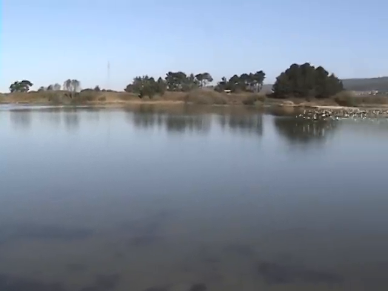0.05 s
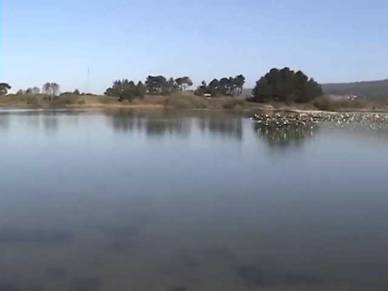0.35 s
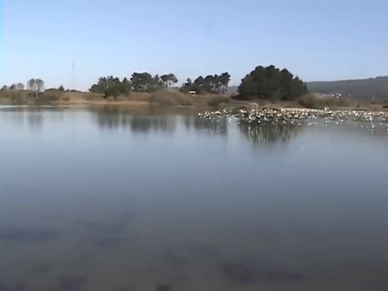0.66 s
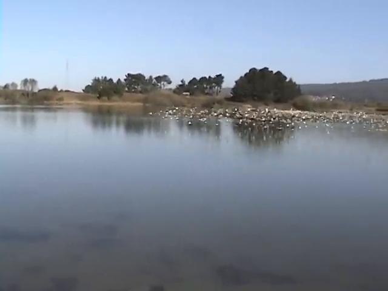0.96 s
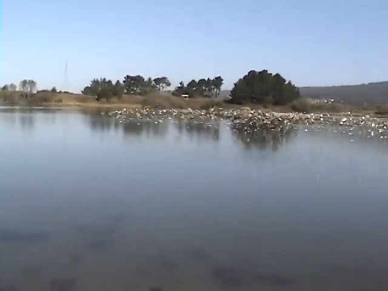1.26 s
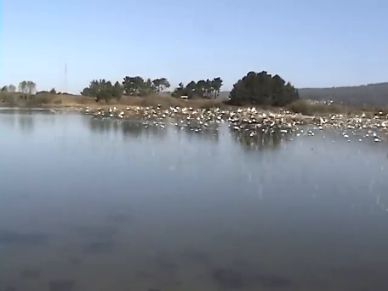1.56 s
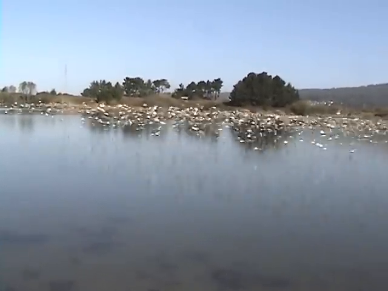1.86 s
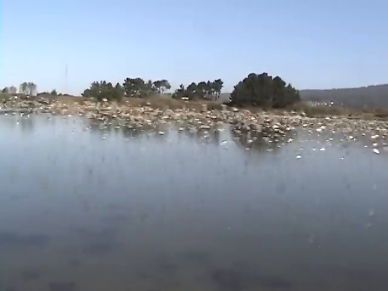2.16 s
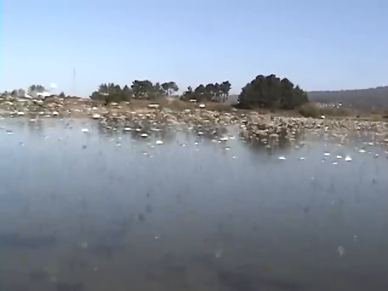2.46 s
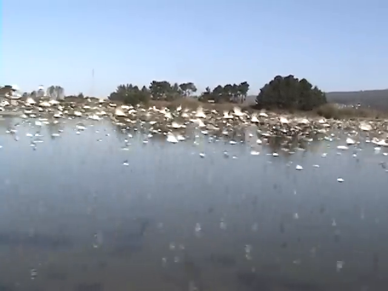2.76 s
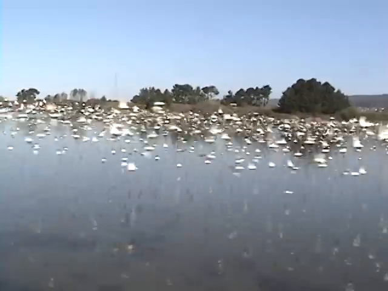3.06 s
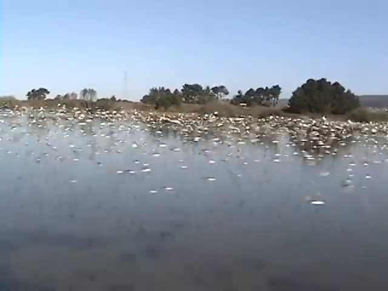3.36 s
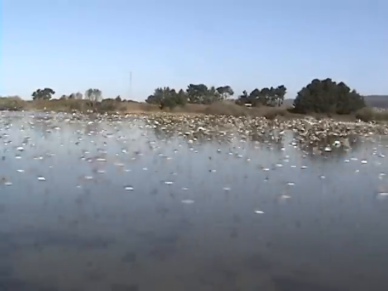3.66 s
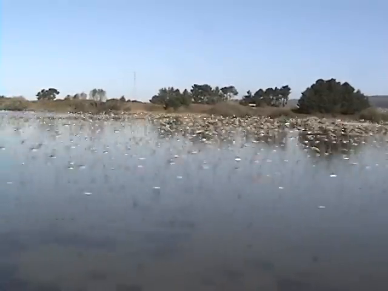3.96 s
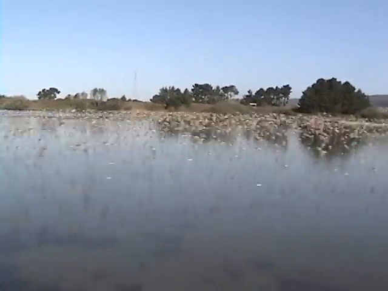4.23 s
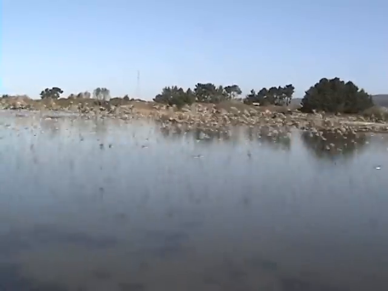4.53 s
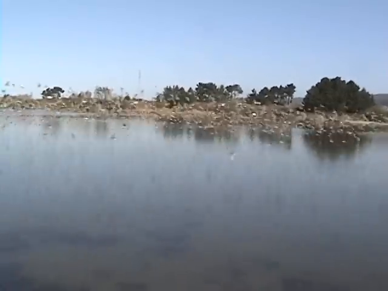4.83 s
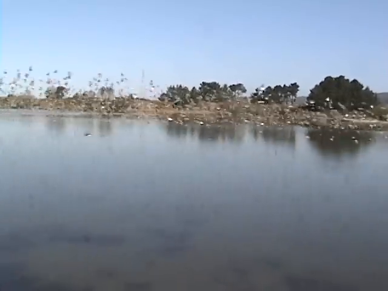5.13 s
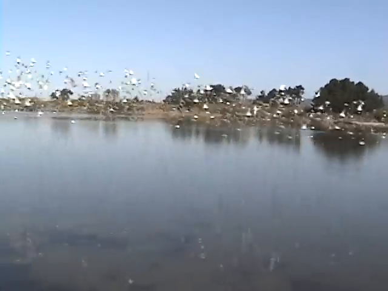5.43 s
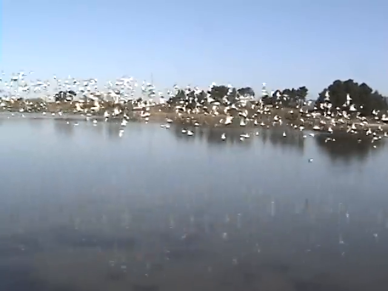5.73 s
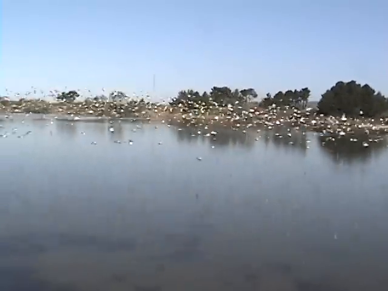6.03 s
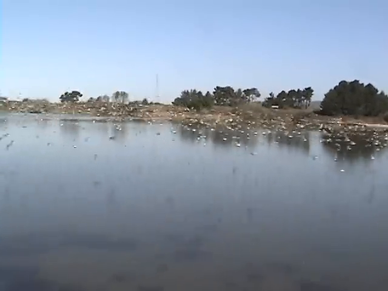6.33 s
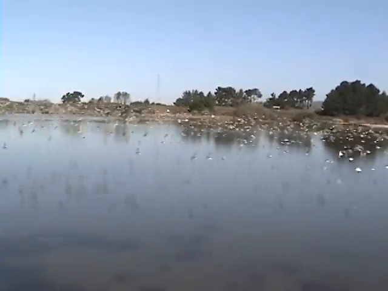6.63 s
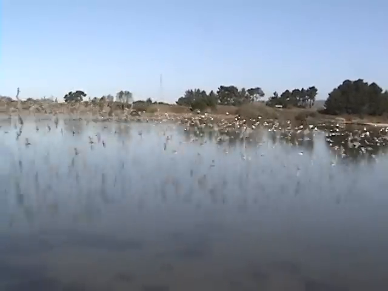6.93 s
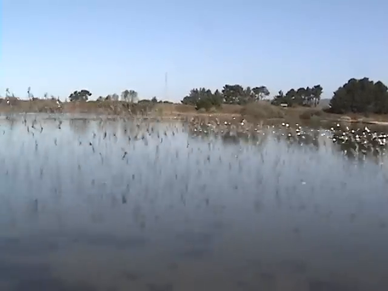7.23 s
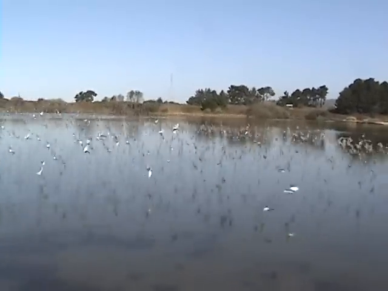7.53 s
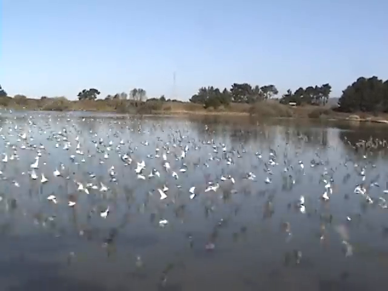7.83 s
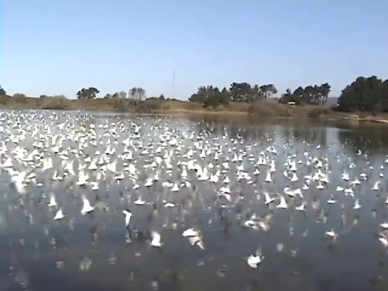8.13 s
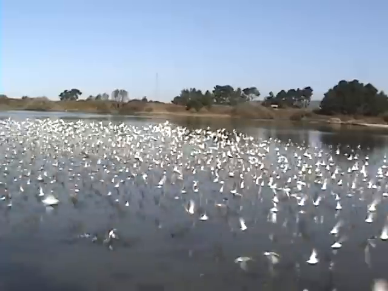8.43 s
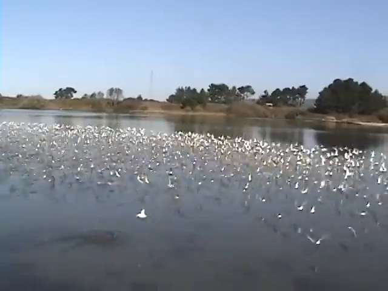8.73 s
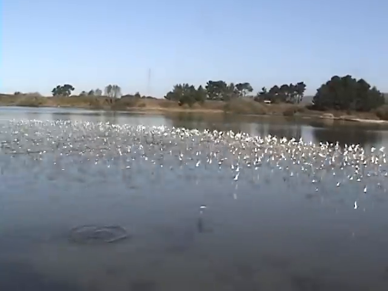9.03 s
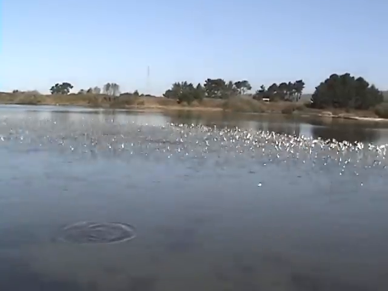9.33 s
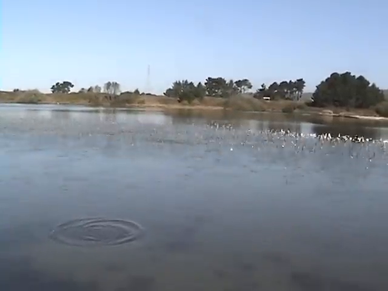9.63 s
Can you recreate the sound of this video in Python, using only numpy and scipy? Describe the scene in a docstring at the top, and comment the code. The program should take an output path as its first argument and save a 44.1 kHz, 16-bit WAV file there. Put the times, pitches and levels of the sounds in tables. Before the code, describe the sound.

A large flock of small shorebirds chirps over open water, drifting from right to left, with a surf-like roar far behind. A single bird calls briefly nearby. The overlapping high voices grow dense and shrill as the flock approaches, then hundreds of wings rush, flutter and snap just above the microphone, causing a short low rumble of air. The wings ease off while the twittering continues.

```python
"""Thin peeps and a far twitter carry across a lagoon, over a steady distant roar like surf.
A large flock of sandpipers wheels well out from the stereo microphone, and one bird calls close by.
The whistled chirps thicken into a shrill chorus, then the flock sweeps low overhead at about 8 s:
hundreds of wings push air in a rush, feathers rustle, wing tips snap now and then,
and the draught buffets the microphone."""
import sys
import numpy as np
from scipy import signal
from scipy.fft import rfft, irfft
from scipy.io import wavfile
from scipy.ndimage import uniform_filter1d, map_coordinates

SR = 44100
rng = np.random.default_rng(int(sys.argv[2]) if len(sys.argv) > 2 else 0)


def log_audio(samples):
    """Write samples as a 16-bit WAV file to the path given in sys.argv[1]."""
    # one column per channel
    frames = np.atleast_2d(samples).T
    # limit to full scale, then quantise
    limited = np.clip(frames, -1, 1)
    pcm = np.round(limited * 32767).astype(np.int16)
    wavfile.write(sys.argv[1], SR, pcm)


N = 435708
TIME = np.arange(N) / SR

# Levels are relative, ahead of each source's gain. Side is left level minus right level.
# spectrum of the far roar: f/Hz, level/dB
ROAR_SPECTRUM = [(20, -2.5), (55, 6), (85, 6), (120, 2.5), (220, 0.5), (330, -2), (420, -11.5), (560, -12),
                 (780, -14), (1200, -12.5), (1600, -23.5), (2400, -22), (5000, -33), (10000, -39.5),
                 (15000, -49)]
# likeness of the two channels for the roar: f/Hz, correlation (negative is opposite phase)
ROAR_CORRELATION = [(25, -0.77), (60, 0.12), (85, 0.53), (135, 1), (200, 0.89), (300, 0.99), (640, 0.3),
                    (1400, 0.31), (3100, -0.76), (7000, -0.77), (14000, .6)]
# the flock wheels twice far out, then sweeps past: t/s, air rush/dB, feather rustle/dB, chorus/dB
FLOCK_LEVELS = [(0, -53, -71.5, -58.5), (1.1, -52.5, -68.5, -63), (1.9, -52, -64.5, -63),
                (2.6, -49.5, -61, -54.5), (3.05, -47, -60.5, -54.5), (3.8, -49.5, -64.5, -55),
                (4.8, -51, -65.5, -59.5), (5.6, -51.5, -64, -59), (6.25, -50.5, -66, -54.5),
                (6.9, -49.5, -62.5, -50), (7.35, -49.5, -57.5, -40.5), (7.8, -46.5, -53.5, -34),
                (8.1, -41, -49.5, -36), (8.32, -35.5, -45, -39), (8.6, -38, -50.5, -46.5),
                (9.15, -39.5, -54, -44), (9.5, -42, -56, -42), (9.88, -44.5, -61.5, -42.5)]
# the flock crosses from right to left and leaves straight ahead: t/s, side/dB
FLOCK_SIDE = [(0, -8), (1.9, -11.5), (2.9, -8.5), (3.6, -2.5), (5.6, 4), (6.3, 5.5), (7.2, 11), (8.34, 0.5),
              (9.88, 0.5)]
# Doppler shift as the flock comes and goes: t/s, pitch factor
FLOCK_DOPPLER = [(0, 1.066), (6.3, 0.93), (7.9, 1.017), (8.8, .98), (9.88, 0.96)]
# spectrum of the merged far voices: f/Hz, level/dB
SHRILL_SPECTRUM = [(1500, -43), (2500, -14), (3500, -8), (4150, -0.5), (4750, -7), (5400, -10), (6600, -18),
                   (8700, -26), (12000, -54)]
# likeness of the two channels for those voices: f/Hz, correlation
SHRILL_CORRELATION = [(1000, 0.73), (14000, 0.82)]
# spectrum of the air pushed by the wings: f/Hz, level/dB
RUSH_SPECTRUM = [(20, -7), (70, -2.5), (190, 1), (330, -3.5), (430, -13.5), (560, -14.5), (780, -8.5),
                 (1200, -12.5), (1700, -17), (3000, -21), (5000, -47), (9000, -53), (15000, -65)]
# spectrum of the feathers: f/Hz, level/dB
RUSTLE_SPECTRUM = [(800, -9), (2000, 6.5), (3200, 8), (5000, 8), (7000, 1.5), (9000, 0.5), (12000, -6),
                   (14000, -14), (15500, -36)]
# likeness of the two channels for the wings: f/Hz, correlation
WING_CORRELATION = [(25, .3), (60, 0.99), (110, 1), (250, 1), (640, 0.89), (1400, 0.85), (3100, 0.36),
                    (7000, 0.69), (14000, 0.66)]
# spectrum of single wing strokes close by: f/Hz, level/dB
FLAP_SPECTRUM = [(250, -25), (480, -28), (660, 3), (850, 0), (1250, -16.5), (1800, -31), (3500, -38),
                 (15000, -75)]
# high arched peeps of the nearer birds: t/s, length/s, mid-note f/Hz, level/dB, side/dB, warble depth/Hz
PEEP_NOTES = [(0.042, 0.063, 6450, -58, -5, 400), (0.148, 0.045, 5650, -56.5, -11, 200),
              (0.217, 0.057, 6740, -56.5, -6, 500), (0.268, 0.02, 4300, -47, -12, 0),
              (0.323, 0.03, 4620, -55, -11, 0), (0.365, 0.025, 4850, -54, -7, 0),
              (0.372, 0.039, 6960, -57.5, -7, 350), (0.43, 0.021, 5670, -64, -7, 0),
              (0.628, 0.025, 5700, -60, -11, 0), (0.68, 0.036, 6260, -60.0, -11, 0),
              (0.759, 0.067, 6650, -58, -1, 600), (1.07, 0.03, 6400, -60, -9, 0),
              (1.255, 0.054, 7200, -61, -9, 0), (1.363, 0.05, 6800, -51.5, -3, 500),
              (1.509, 0.042, 7000, -54.5, -4, 300), (1.569, 0.023, 4900, -56.0, -5, 0),
              (1.72, 0.04, 4550, -58, -6, 200), (1.803, 0.035, 4700, -51, -6, 400),
              (1.891, 0.045, 5170, -47.5, -8, 400), (1.941, 0.043, 4900, -50.0, -6, 350),
              (2.056, 0.025, 5000, -51.5, -5, 0), (2.123, 0.022, 4740, -49.5, -10, 0),
              (2.215, 0.026, 5720, -51, -5, 0), (2.241, 0.023, 5000, -50.5, -11, 0),
              (2.33, 0.03, 4970, -55, -6, 0), (2.366, 0.03, 7150, -52.5, 0, 0),
              (2.386, 0.033, 4800, -45.5, -7, 0), (2.439, 0.036, 6430, -48, -4, 200),
              (2.502, 0.026, 5700, -58, -6, 0), (2.513, 0.03, 4470, -48.5, 2, 0),
              (2.572, 0.028, 6800, -54.5, -6, 0), (2.578, 0.039, 4870, -46, -7, 400),
              (2.663, 0.019, 6800, -53, -1, 0), (2.673, 0.017, 4500, -44.5, -1, 0),
              (2.748, 0.037, 4400, -43, -9, 150), (2.817, 0.06, 5180, -45.5, -10, 150),
              (3.006, 0.023, 5250, -55, -12, 0), (3.067, 0.018, 5400, -48, -2, 0),
              (3.28, 0.028, 5930, -50, -3, 0), (3.296, 0.05, 4500, -48, -6, 120),
              (3.394, 0.035, 4670, -51, 1, 150), (3.476, 0.045, 4700, -61, 4, 0),
              (3.565, 0.033, 4680, -49.5, -1, 0), (3.62, 0.024, 4560, -49.5, 2, 0),
              (3.684, 0.028, 4700, -50.5, 3, 0), (3.748, 0.028, 5100, -58, 3, 0),
              (3.863, 0.038, 7600, -62, 3, 0), (4.019, 0.02, 4200, -50, -1, 0),
              (4.202, 0.026, 6400, -51, -4, 0), (4.332, 0.028, 4340, -49.0, 4, 0),
              (4.451, 0.036, 6220, -54.5, 9, 0), (4.485, 0.04, 4580, -51, 8, 300),
              (4.752, 0.037, 6060, -53, -1, 400), (4.775, 0.029, 4400, -50.0, -3, 0),
              (5.106, 0.02, 5720, -51.0, 12, 0), (5.13, 0.016, 3690, -51, 9, 0),
              (5.175, 0.039, 5350, -51, -1, 450), (5.255, 0.02, 4700, -53.5, 1, 0),
              (5.305, 0.019, 4100, -52, -1, 0), (5.452, 0.037, 4530, -47.5, -7, 0),
              (5.505, 0.06, 6260, -57.5, 11, 300), (5.623, 0.026, 4800, -52, -2, 0),
              (5.756, 0.044, 4500, -52, -1, 300), (6.09, 0.032, 4660, -52, 13, 0),
              (6.315, 0.03, 4530, -46.5, -3, 2), (6.343, 0.028, 4650, -50, 12, 0),
              (6.366, 0.032, 4560, -48.5, 10, 0), (6.846, 0.041, 5720, -52, 12, 300),
              (6.91, 0.033, 5300, -47, 14, 200), (7.004, 0.061, 6570, -49.5, 9, 298),
              (7.036, 0.037, 4550, -45, -4, 0), (7.084, 0.042, 4780, -43.0, 7, -2),
              (7.244, 0.029, 4630, -40.5, 12, 0), (7.295, 0.028, 5300, -44.0, 10, 0),
              (7.389, 0.026, 4650, -51, 12, 0), (7.418, 0.033, 4650, -39.5, 12, 0),
              (8.17, 0.024, 5450, -38, 10, 0), (9.28, 0.028, 6500, -53, -1, 0)]
# their lower, slurred notes: t/s, length/s, mid-note f/Hz, level/dB, side/dB, half the fall as a share of f
SLUR_NOTES = [(0.484, 0.059, 3080, -47.5, -13, 0.04), (0.845, 0.052, 3290, -50.5, -14, 0.014),
              (1.28, 0.047, 3000, -52.5, -4, 0.029), (1.978, 0.023, 2880, -52.5, -4, 0.02),
              (3.128, 0.033, 2750, -48.5, -11, 0.18), (3.219, 0.054, 3060, -52, -1, 0.05),
              (3.255, 0.11, 2700, -49, 12, 0.04), (3.524, 0.04, 2580, -53, -2, 0.15),
              (3.725, 0.029, 3050, -50.0, 2, -0.12), (3.765, 0.028, 2300, -51.5, 2, 0.02),
              (3.869, 0.058, 3100, -44, -10, 0.024), (4.117, 0.044, 2970, -51, 3, 0.043),
              (4.371, 0.1, 2060, -53, 3, 0.021), (4.61, 0.026, 3060, -53.0, 4, 0.026),
              (4.722, 0.075, 2970, -53.0, 1, 0.05), (4.884, 0.035, 3050, -54, -2, 0.12),
              (5.074, 0.036, 2310, -46, -5, 0.077), (5.122, 0.043, 2070, -49.0, -3, 0.024),
              (5.228, 0.035, 2930, -53, 5, 0.028), (5.295, 0.066, 3270, -54.5, 2, -0.0078),
              (6.002, 0.033, 2790, -52.0, -4, 0.14), (6.131, 0.21, 3090, -49.5, 11, 0),
              (6.563, 0.026, 3550, -45.0, 11, 0.09), (6.61, 0.15, 3340, -52.0, 12, 0.011),
              (7.28, 0.05, 1980, -49.5, 0, -0.08), (8.603, 0.025, 2970, -41.0, -3, 0.09),
              (9.152, 0.046, 3000, -45, -4, 0), (9.775, 0.052, 2760, -45.5, -9, 0.04)]
# snaps and knocks, as of wing tips clapping or touching water: t/s, body/dB, body f/Hz, bright edge/dB
WING_SNAPS = [(2.5206, -45, 1630, -38), (2.952, -31, 1060, -59), (3.0995, -25.5, 2140, -28),
              (4.172, -37, 1360, -39), (4.885, -31, 1360, -51), (7.125, -34, 2410, -40),
              (7.551, -35, 850, -58), (7.8, -25.5, 1900, -55), (7.9533, -23.5, 2710, -30),
              (8.057, -33, 2950, -21), (8.076, -38, 2200, -45), (8.118, -29, 2300, -36),
              (8.1224, -38, 2780, -29), (8.1763, -19, 2410, -40), (8.2515, -38, 2000, -33),
              (8.2803, -24.5, 1786, -34), (8.2995, -28, 1978, -26), (8.41, -35, 2000, -32),
              (8.428, -40, 2090, -28), (8.458, -34, 2200, -35), (8.5148, -40, 2000, -35),
              (8.532, -42, 2000, -33), (8.544, -41, 1220, -29), (8.57, -38, 2036, -28),
              (8.6016, -30, 3000, -26.5), (8.685, -33, 1800, -37), (8.7448, -38, 1790, -35),
              (8.8086, -40, 1800, -36), (9.113, -38, 1250, -31), (9.1967, -25, 1800, -28.5),
              (9.2207, -38, 2000, -35), (9.235, -38, 2000, -38), (9.31, -31.5, 2200, -44),
              (9.449, -31, 2200, -48)]
# run-on syllables of the bird close to the microphone: t/s, top f/Hz, level/dB, rasp 0-1
NEAR_SYLLABLES = [(4.19, 5050, -35, 0.4), (4.202, 5450, -40, 0.86), (4.213, 4600, -43, .5),
                  (4.223, 4080, -35.5, .25), (4.236, 4950, -34.5, 0.36), (4.248, 4220, -30.5, 0.2),
                  (4.263, 4700, -29.5, 0.15), (4.286, 4780, -25, 0.02), (4.314, 4680, -28, 0.1)]
# spectrum of the draught on the microphone: f/Hz, level/dB
DRAUGHT_SPECTRUM = [(20, -22), (50, -2), (110, -0.5), (250, -8), (450, -13), (700, -19.5), (2000, -51)]


def amp(db):
    """Decibels to gain."""
    return 10 ** (np.asarray(db) / 20)


def unit(x):
    """Scales to rms 1."""
    return x / np.sqrt(np.mean(x ** 2) + 1e-20)


def read(points, hz):
    """A spectrum table read on a log-frequency axis."""
    f, value = np.transpose(points)
    return np.interp(np.log(hz + 1), np.log(f), value)


def follow(table, t, column=1):
    """One column of a curve table at the times t."""
    rows = np.array(table)
    return np.interp(t, rows[:, 0], rows[:, column])


def add(mix, s, sound):
    """Mixes a stereo sound in at time s."""
    part = mix[:, max(round(s * SR), 0):][:, :sound.shape[1]]
    part += sound[:, :part.shape[1]]


def pan(side_db):
    """Left and right gains for a level difference; positive is to the left."""
    return amp(np.array([[.5], [-.5]]) * side_db)


def wobble(size, hz):
    """A random curve that takes a new course hz times a second."""
    knots = rng.standard_normal(size // 8 + 2)
    return np.interp(np.arange(size) * hz / SR, np.arange(len(knots)), knots)


def noise():
    """Two unrelated channels of white noise."""
    return rng.standard_normal((2, N))


def colour(pair, spectrum, correlation=WING_CORRELATION):
    """Gives two unrelated signals a spectrum and the correlation of the microphone pair, at rms 1."""
    hz = np.fft.rfftfreq(N, 1 / SR)
    same = np.clip(read(correlation, hz), -1, 1)
    mid, side = rfft(pair) * np.sqrt([1 + same, 1 - same]) * amp(read(spectrum, hz))
    return unit(irfft(np.array([mid + side, mid - side]), N))


def distant_roar(level_db=-43.0):
    """A steady low roar, like far surf."""
    return colour(noise(), ROAR_SPECTRUM, ROAR_CORRELATION) * amp(level_db)


def whistle(hz, side_db, overtone_db=-27, lead_rad_per_db=0.093):
    """A syrinx tone with a weak octave; it reaches the nearer microphone a little earlier."""
    phase = 2 * np.pi * np.cumsum(hz) / SR + np.array([[.5], [-.5]]) * lead_rad_per_db * side_db
    return np.sqrt(2) * pan(side_db) * (np.sin(phase) + amp(overtone_db) * np.sin(2 * phase))


def far_calls(per_s, centre_hz, spread, arch, length_s, distance_db, quaver=0.0267, candidates=12000):
    """Arched, quavering, mostly falling chirps at random times and distances, at rms 1."""
    out = np.zeros((2, N))
    unsteady = 1 + quaver * wobble(2 * N, 350)
    timings, birds = rng.random((candidates, 3)), rng.standard_normal((candidates, 5))
    for (when, chance, span), (pitch, bend, fall, nearness, side) in zip(timings, birds):
        at = int(when * N)
        if chance * candidates > per_s[at] * N / SR:  # thin out to per_s calls a second
            continue
        hz = centre_hz * follow(FLOCK_DOPPLER, TIME[at]) * np.exp(spread * pitch)
        u = np.linspace(-1, 1, int(length_s * (.5 + span) * SR))
        glide = 1 + arch * (0.31 + abs(bend)) * (1 / 4 - u ** 2) - arch * (0.343 + 0.567 * fall) * u
        glide *= unsteady[int(span * N):][:len(u)]
        voice = whistle(hz * glide, follow(FLOCK_SIDE, TIME[at]) + 4 * side, overtone_db=-18)
        gain = amp(distance_db * np.clip(nearness, -2, 1.5)) / np.sqrt(per_s[at])
        add(out, TIME[at] - length_s / 2, voice * (1 - u ** 4) * gain)
    return unit(out)


def shrill_band(level_db=-2.0, shimmer_db=2.6, width=0.7):
    """Hundreds of far voices merge into one shimmering band, Doppler-shifted as the flock moves."""
    band = colour(noise(), SHRILL_SPECTRUM, SHRILL_CORRELATION)
    position = np.cumsum(follow(FLOCK_DOPPLER, TIME))
    shifted = np.array([map_coordinates(side, [position], order=3, mode="mirror") for side in band])
    return shifted * pan(width * follow(FLOCK_SIDE, TIME)) * amp(level_db + shimmer_db * wobble(N, 120))


def chorus(twitter_db=-57.5, sparse_per_s=60, dense_per_s=400):
    """Birds far over the water call at random; as they near, their voices merge into a shrill band."""
    level_db = follow(FLOCK_LEVELS, TIME, column=3)
    crowd = np.interp(level_db, [-57, -45], [0, 1])
    per_s = sparse_per_s * (dense_per_s / sparse_per_s) ** crowd
    high = far_calls(per_s, centre_hz=4286, spread=.08, arch=.1034, length_s=.033, distance_db=6.5)
    low = far_calls(per_s * .46, centre_hz=2963, spread=.13, arch=.136, length_s=.055, distance_db=3.5)
    strays = far_calls(per_s * .5, centre_hz=4490, spread=.16, arch=.25, length_s=.027, distance_db=1)
    separate = high * amp(1.8 + 1.2 * crowd) + low * amp(-7 - 2.2 * crowd) + strays * amp(-8)
    # a faint twitter of all pitches goes on throughout
    twitter = far_calls(np.full(N, 75), centre_hz=3306, spread=.24, arch=.17, length_s=.035,
                        distance_db=7.5)
    merged = np.interp(crowd, [0, 1], [.22, .64])
    voices = np.sqrt(1 - merged) * separate + np.sqrt(merged) * shrill_band()
    return amp(level_db) * voices + amp(twitter_db) * twitter


def shore(x, t60_s, wet_db):
    """The lagoon's water and banks scatter a thin, short tail."""
    t = np.arange(SR // 2) / SR
    tail = rng.standard_normal((2, len(t))) * amp(-60 * t / t60_s)
    return x + amp(wet_db) * signal.fftconvolve(x, tail / np.linalg.norm(tail[0]), axes=1)[:, :N]


def wings(rush_db=7, rustle_db=7, flick_db=-2, flicks_per_s=500, size_db=4.5, flutter_db=2.5):
    """Wing strokes push air in a low rush; the feathers hiss and flick."""
    beats = wobble(N, 40)
    rush = colour(noise(), RUSH_SPECTRUM) * amp(follow(FLOCK_LEVELS, TIME) + rush_db + beats)
    feather_db = follow(FLOCK_LEVELS, TIME, column=2)
    closeness = np.interp(feather_db, [-64, -48], [.55, 1])
    # each flick is a millisecond puff of noise; single ones stand out near the microphone
    onsets = rng.random(N) < flicks_per_s / SR
    flicks = onsets * amp(size_db * closeness * np.minimum(rng.exponential(1, N), 3.8))
    puffs = signal.lfilter([1], [1, -np.exp(-1 / (0.00026 * SR))], flicks) * noise()
    hiss = colour(noise(), RUSTLE_SPECTRUM)
    hiss *= amp(rustle_db + flutter_db * closeness * (beats + wobble(N, 160)))
    feathers = (hiss + amp(flick_db) * colour(puffs, RUSTLE_SPECTRUM)) * amp(feather_db)
    return rush + feathers * pan(0.18 * follow(FLOCK_SIDE, TIME))


def flaps(gain_db=-3.2, per_s=90, size_db=3.0, stroke_s=0.01):
    """The nearest wing strokes arrive one by one, as soft puffs that flutter through the rush."""
    rush_db = follow(FLOCK_LEVELS, TIME)
    closeness = np.interp(rush_db, [-50, -39], [.4, 1])
    strokes = (rng.random(N) < per_s / SR) * amp(size_db * np.minimum(rng.exponential(1, N), 3))
    puffs = signal.oaconvolve(strokes, np.hanning(int(stroke_s * SR)), "same") * noise()
    return colour(puffs, FLAP_SPECTRUM) * closeness * amp(rush_db + gain_db)


def chirp(length_s, hz, arch, fall, warble_hz, side_db, trill_hz=60, jitter=0.016, flutter_db=2.5):
    """One arched, unevenly warbling note at rms 1; a reflection off the water roughens it."""
    u = np.linspace(0, 1, max(int(length_s * SR), 64))
    from_middle = 2 * u - 1
    glide = hz * (1 - arch * from_middle ** 2 - fall * from_middle)
    knots = rng.standard_normal((3, 96))
    pitch_drift, level_drift, pace = (np.interp(u * length_s * 400, np.arange(96), k) for k in knots)
    trill = warble_hz * np.sin(2 * np.pi * (np.cumsum(trill_hz * (1 + 0.303 * pace)) / SR + rng.random()))
    swell = signal.windows.tukey(len(u), .3) * amp(flutter_db * level_drift)
    rasp = 0.55 * warble_hz * wobble(len(u), 1200)  # calls that warble widely also rasp
    direct = swell * whistle((glide + trill + rasp) * (1 + jitter * pitch_drift), side_db)
    lag = int(SR * rng.uniform(0.0024, 0.0042))
    reflected = 0.24 * np.pad(direct, ((0, 0), (lag, 0)))
    return unit(np.pad(direct, ((0, 0), (0, lag))) + reflected)


def single_birds(common_hz=4675, slur_s=0.0414, slur_db=-0.5):
    """Peeps and slurs from the near side of the flock, each bird in its own place."""
    out = np.zeros((2, N))
    for s, length_s, hz, db, side_db, warble_hz in PEEP_NOTES:
        arch = 0.119 + 0.5 * max(1 - common_hz / hz, 0)  # steeper above the common pitch
        add(out, s, amp(db) * chirp(length_s, hz, arch, 0.049, warble_hz, side_db))
    for s, length_s, hz, db, side_db, fall in SLUR_NOTES:
        arch = 0.071 * slur_s / length_s  # longer slurs are held flatter
        warble_hz = 32 * np.sqrt(length_s / slur_s)
        add(out, s, amp(db + slur_db) * chirp(length_s, hz, arch, fall, warble_hz, side_db))
    return out


def snaps(edge_hz=7800, body_decay_s=0.0017, edge_decay_s=0.0006, echo_s=0.0017, echo=0.51):
    """Cracks with a dull body and a bright edge, each repeated at once by the water surface."""
    t = np.arange(700) / SR
    out = np.zeros((2, N))
    for s, body_db, body_hz, edge_db in WING_SNAPS:
        place = pan(follow(FLOCK_SIDE, s))
        for hz, db, fade_s in (body_hz, body_db + 1, body_decay_s), (edge_hz, edge_db + 5, edge_decay_s):
            shape = np.exp(-t / fade_s) + echo * (t > echo_s) * np.exp(-abs(t - echo_s) / fade_s)
            band = signal.butter(2, [hz * 0.48, hz * 1.32], "bandpass", fs=SR)
            crack = signal.lfilter(*band, shape * rng.standard_normal(len(t)))
            add(out, s, amp(db) * place * crack / abs(crack).max())
    air = signal.butter(3, 10800, fs=SR)
    return signal.lfilter(*air, out)


def near_bird(end_s=4.332, arch=0.082, dip_db=-12, rasp_hz=450, fifth_db=-35, side_db=2):
    """Close to the microphone, a rasp clears into a wavering whistle with a faint fifth above."""
    starts, top_hz, level_db, roughness = np.transpose(NEAR_SYLLABLES)
    t = np.arange(starts[0], end_s, 1 / SR)
    progress = np.interp(t, np.append(starts, end_s), np.arange(len(starts) + 1))
    syllable = np.minimum(progress.astype(int), len(starts) - 1)
    edge = (2 * (progress - syllable) - 1) ** 2  # pitch and level sag at each syllable's ends
    rasp = roughness[syllable]
    glide = uniform_filter1d(top_hz[syllable] * (1 - arch * edge), size=220)
    hz = glide + rasp_hz * rasp * wobble(len(t), 1500)
    voice = whistle(hz, side_db, overtone_db=-30 + 8.1 * rasp)
    voice += amp(fifth_db) * whistle(1.5 * hz, side_db)
    swell = uniform_filter1d(amp(level_db[syllable] + dip_db * edge), size=64, mode="constant")
    out = np.zeros((2, N))
    add(out, t[0], voice * swell)
    return out


def draught(level_db=-33.0, hold_from_s=8.02, hold_to_s=8.47, rise_db_per_s=22.5, fall_db_per_s=37):
    """Air driven ahead of the flock buffets the microphone, holds while it is overhead, and dies away."""
    away_db = np.maximum(rise_db_per_s * (hold_from_s - TIME), fall_db_per_s * (TIME - hold_to_s))
    return colour(noise(), DRAUGHT_SPECTRUM) * amp(level_db - np.maximum(away_db, 0))


def scene():
    """Voices and wings over the lagoon; the close bird carries less echo than the flock."""
    flock = shore(single_birds() + chorus(), t60_s=0.26, wet_db=-9.5)
    close_call = shore(near_bird(), t60_s=0.21, wet_db=-20)
    return flock + close_call + wings() + flaps() + draught() + snaps() + distant_roar()


def record(dry, whine_hz=15734, whine_db=-81, cutoff_hz=15850):
    """The camera adds its faint whine to the microphone signal and limits the band."""
    whine = np.sqrt(2) * amp(whine_db) * np.sin(2 * np.pi * whine_hz * TIME)
    low_pass = signal.firwin(1023, cutoff_hz, window=("kaiser", 9), fs=SR)
    return signal.oaconvolve(dry + whine, low_pass[None], "same", axes=1)


dry = scene()
out = record(dry)
log_audio(out)
```